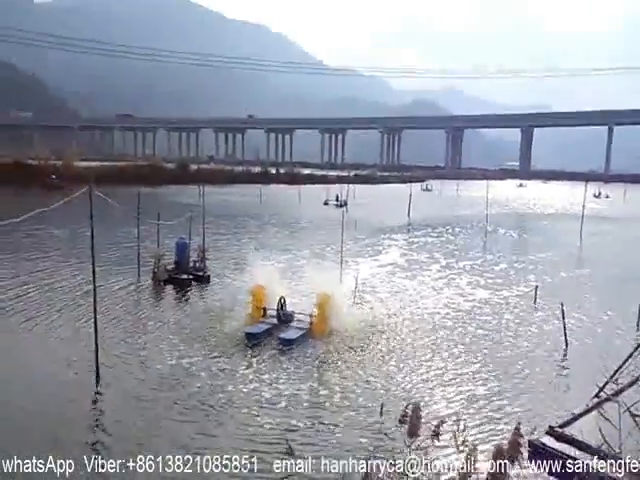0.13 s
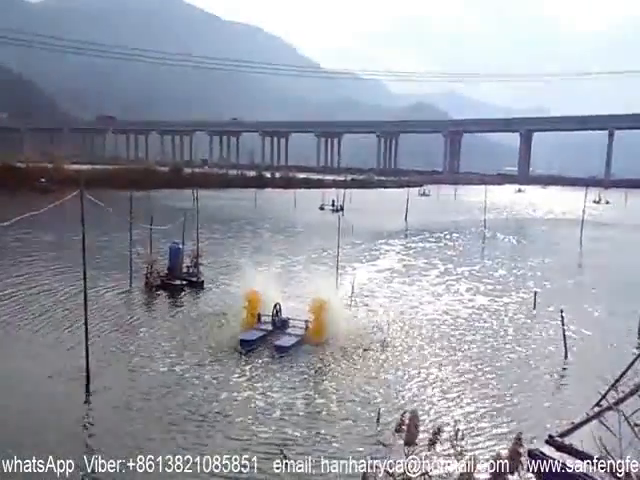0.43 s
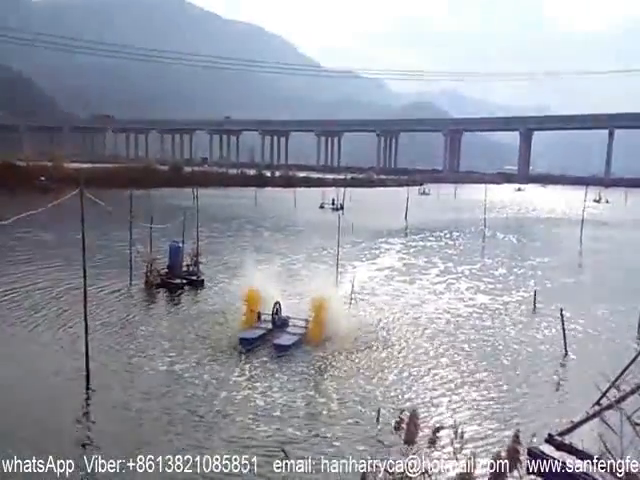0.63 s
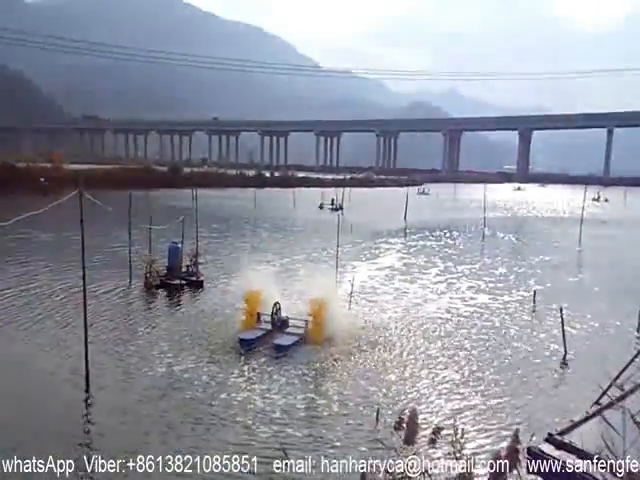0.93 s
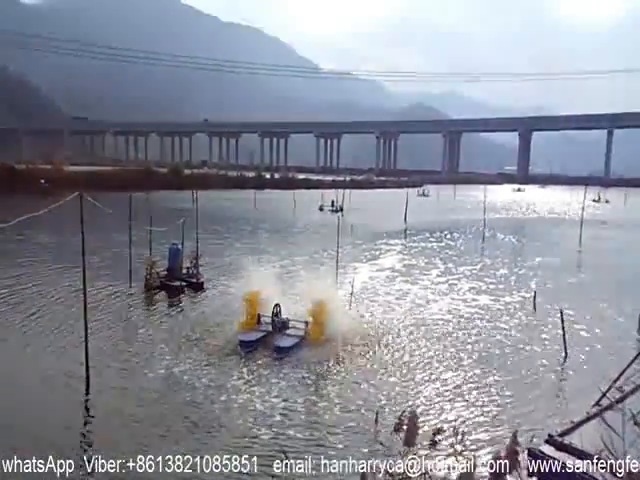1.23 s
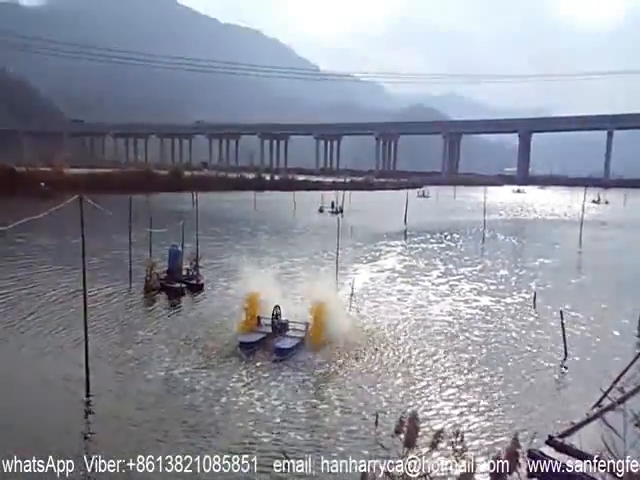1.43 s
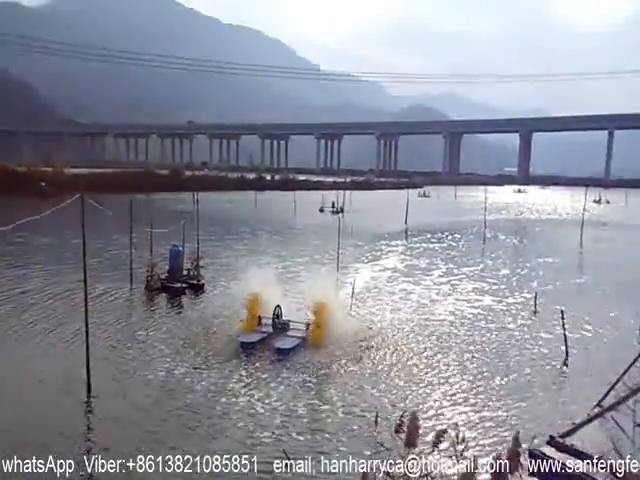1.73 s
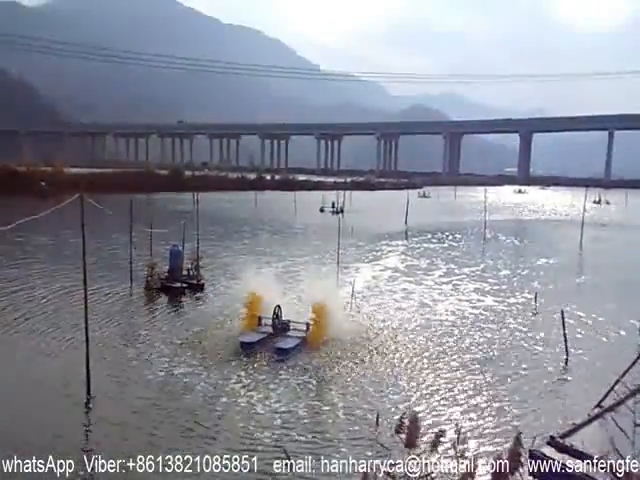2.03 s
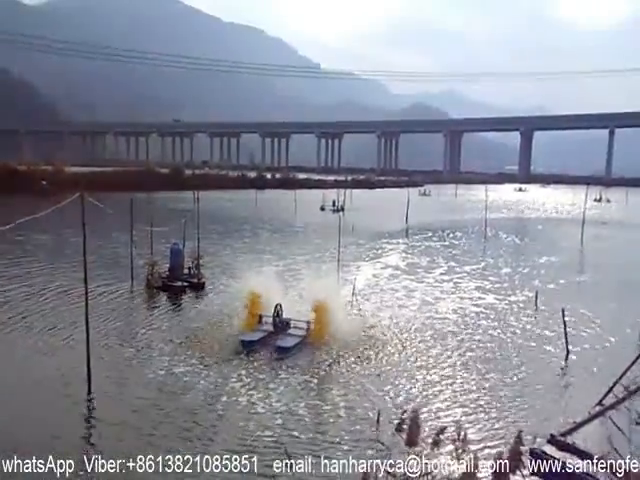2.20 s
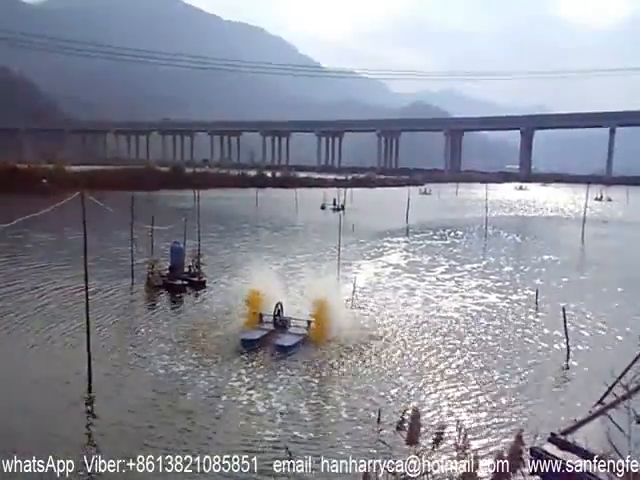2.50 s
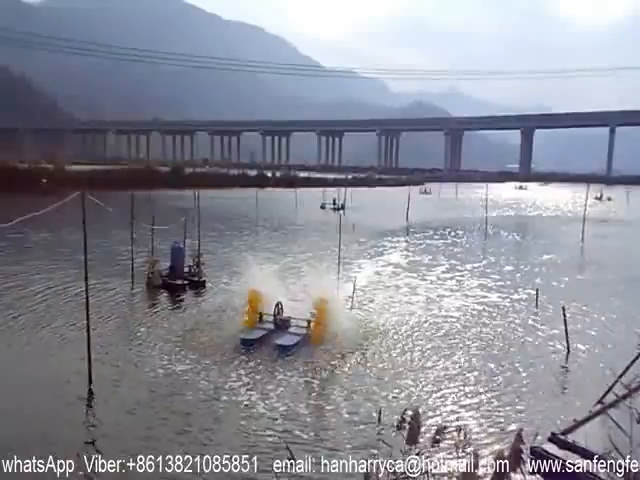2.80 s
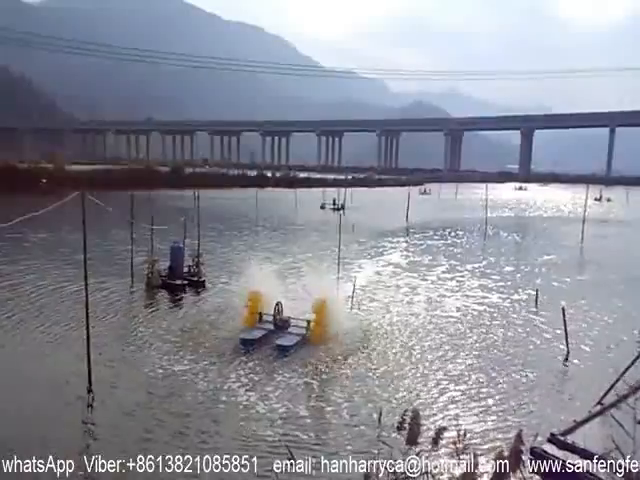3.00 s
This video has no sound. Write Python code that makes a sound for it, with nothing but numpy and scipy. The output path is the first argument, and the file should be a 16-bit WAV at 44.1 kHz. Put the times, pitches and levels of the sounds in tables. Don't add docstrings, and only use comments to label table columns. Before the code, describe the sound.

Steady low gear hum and churning water spray from a pond aerator, with rumbling wind buffets

```python
import sys
import numpy as np
from scipy import signal
from scipy.fft import rfft, irfft, next_fast_len
from scipy.io import wavfile

SR = 44100
rng = np.random.default_rng(int(sys.argv[2]) if len(sys.argv) > 2 else 0)


def voltage_ratio(level):
    return 10 ** (np.asarray(level, float) / 20)


def waveform_to_disk(signal):
    frames = np.transpose(np.atleast_2d(signal))
    scaled = np.clip(frames, -1, 1) * 32767
    samples = np.round(scaled).astype(np.int16)
    wavfile.write(sys.argv[1], SR, samples)


N = 138915

TURN_S, MESH_HZ = 0.6226, 128.5
# multiple of mesh rate, level/dB
GEAR_TONES = [(1, -24.5), (2, -27.5), (2.62, -37), (3, -35), (4, -42.5), (5, -40.5), (5.4, -55), (6, -34)]
# throbs/turn, depth/dB, first crest t/s
TONE_THROBS = [
    [(1, 1.2, 0.42), (4, 1, 0.13)],
    [(1, 2.6, .565), (3, 1.3, .17), (6, 3.6, .006), (7, 1.5, .031)],
    [(2, 3.5, 0.067), (4, 5, 0.0015), (7, 4.5, 0.058), (11, 4, 0.018)],
    [(1, 5.5, .05), (2, 1.8, .04), (4, 2.2, .151), (6, 2.6, .003)],
    [(1, 3, 0.62), (6, 5, 0.0011)],
    [(8, 4.5, .025), (11, 1.8, .037), (12, 1.8, .031)],
    [(1, 5.5, 0.72), (2, 8, 0.54), (3, -10, 0.31), (6, 16, 0.15)],
    [(1, 1.4, 0.17), (2, 1.6, 0.28), (6, 2.5, 0.08), (12, 1, 0.013)],
]
# sways/turn, depth/cycles, first crest t/s
TONE_SWAYS = [
    [(6, .04, .076)],
    [(6, .08, .066), (12, .04, .009)],
    [(6, .05, .07)],
    [(2, .06, .21), (6, .11, .08), (12, .05, .01)],
    [(2, .08, .289), (6, .08, .082)],
    [(1, .08, .272), (6, .17, .068), (8, .09, .006)],
    [(6, .1, .07)],
    [(2, .05, .269), (6, .13, .078)],
]
TONE_WOBBLE_HZ = [.2, .3, 4, .6, 1.5, 2, 8, .9]
# t/s, level/dB
FLOAT_RIDE = [(0, -5), (.55, .5), (1.3, 0), (1.9, 1.5), (2.45, 3), (3.15, 0)]
# t into turn/s, level/dB, length/s, ring f/Hz
ROUGH_TEETH = [
    (.04, -24, .011, 2030),
    (.146, -26, .006, 2000),
    (.238, -34, .008, 2000),
    (.352, -33, .007, 2000),
    (.47, -38, .01, 1950),
    (.56, -40, .012, 1950),
    (.177, -28, .014, 1150),
    (.28, -31, .012, 1150),
    (.582, -28, .01, 1150),
    (.33, -34, .015, 1150),
]
TURN_HARSHNESS_DB = [1, .5, 0, -4, -1, -1]
# f/Hz, density/dB
BODY_SPECTRUM = [(70, -2.5), (130, -22), (200, -11.5), (370, -12), (460, -20.5), (750, -14.5),
                 (1000, -33.5), (1500, -35)]
# f/Hz, density/dB
SPRAY_SPECTRUM = [(1000, 4.5), (1350, 1.5), (1620, -4.5), (1950, 1), (2400, -3.5), (4700, -6.5),
                  (5600, -11), (7000, -21)]
# f/Hz, density/dB
HISS_SPECTRUM = [(5000, -11), (6300, -1.5), (8500, -3), (10500, -1.5), (12800, 3), (14400, -2.5)]
# f/Hz, likeness/0-1
PORT_LIKENESS = [(100, 0.4), (300, 0.62), (1000, 0.93), (2300, 1), (6500, 1), (7800, 0.97), (10000, 0.84),
                 (14000, 0.8)]
# t/s, peak level/dB, f/Hz
LONE_DROPS = [
    (1.125, -25.5, 2520),
    (1.29, -39, 3050),
    (1.393, -33, 3400),
    (1.45, -27, 3170),
    (1.597, -23.5, 2480),
    (1.599, -27, 3630),
    (1.779, -28, 2480),
    (1.843, -27, 2050),
    (1.89, -24.5, 3400),
    (2.011, -31, 3330),
]
# t/s, level/dB
WIND_LEVEL = [(0.0, -15.5), (0.12, -10.5), (0.34, -15.5), (0.65, -19), (0.66, -15), (1.44, -20.5),
              (1.51, -14), (1.78, -17.5), (2.18, -19), (2.24, -14), (2.42, -14), (2.56, -1.5), (2.65, -14),
              (2.75, 2.5), (2.79, -11.5), (3.15, -13.5)]
# f/Hz, density/dB
WIND_SPECTRUM = [(9, 7), (30, 12), (60, 8), (110, 3.5), (200, -9), (400, -23.5)]
# t/s, right peak level/dB, length/s, f/Hz, left against right/dB
EDDY_STRIKES = [(0.126, -10, 0.012, 35, -2.5), (.195, -14.5, 0.03, 92, -6), (0.509, -12, 0.015, 53, 0.5),
                (0.589, -4.5, 0.0059, 134, -5), (0.629, -9, 0.016, 44, 4), (0.692, -6.5, 0.005, 113, -13),
                (0.763, -5, 0.004, 54, -5), (1.077, -11.5, 0.0055, 46, 5), (1.502, -11, 0.033, 56.5, -12),
                (1.534, -19, 0.0069, 29, 5), (1.643, -17.5, 0.038, 45, 3), (1.705, -11, 0.0078, 103, -5),
                (2.25, -3.5, 0.0073, 36.5, -1), (2.467, -4, 0.005, 148, -23), (2.506, -4, 0.0026, 164, -9),
                (2.548, -10, 0.005, 42, 1), (2.572, -2.5, 0.0035, 102, -17), (2.593, -3, 0.0058, 114, -3),
                (2.737, -1.5, 0.017, 69, -24), (2.757, -4.5, 0.02, 101, -12),
                (2.852, -8.5, 0.019, 53.6, -6), (3.14, -9.5, 0.01, 124, -7), (3.058, -7.5, 0.0087, 57, -7),
                (3.124, -6, 0.013, 86, -13), (.125, -8, 0.048, 11.4, -2), (0.239, -17, 0.023, 20, 6),
                (0.423, -19, 0.0069, 87, 2), (0.743, -12.5, 0.045, 9.4, 2), (1.173, -19.5, 0.089, 64, -1),
                (1.307, -16.5, 0.0083, 68, 3), (1.542, -8, 0.036, 27, 1), (1.63, -14, 0.036, 14, 6),
                (2.008, -19, 0.012, 56, -2), (2.255, -9, 0.021, 16, -1), (2.472, -16, 0.021, 16, -9),
                (2.694, -16, 0.012, 79, -12), (2.992, -16, 0.014, 40, -1), (3.085, -9.5, 0.022, 20, 1),
                (1.678, -17.5, 0.027, 79, -2), (2.533, -15, 0.018, 36, -5)]
# t/s, level/dB
RECORDER_GAIN = [(0.0, -43), (0.02, -45.5), (0.61, -43.5), (0.63, -44), (1.37, -42), (1.66, -43.5),
                 (2.0, -41.5), (2.45, -44.5), (2.7, -50.5), (2.96, -56.5), (3.15, -53)]


def in_time(rows):
    s, v = np.transpose(rows)
    return np.interp(np.arange(N) / SR, s, v)


def at_hz(points, hz):
    f, v = np.transpose(points)
    return np.interp(np.log(hz), np.log(f), v)


def rms_one(x):
    return x / np.sqrt(np.mean(x ** 2) + 1e-20)


def drift(rate_hz):
    hop, settle = 40, 2000
    r = np.exp(-2 * np.pi * rate_hz * hop / SR)
    noise = rng.standard_normal(N // hop + 2 + settle)
    slow = signal.lfilter([1], [1, -2 * r, r * r], noise)[settle:]
    return np.interp(np.arange(N) / hop, np.arange(len(slow)), rms_one(slow - slow.mean()))


def ring(clicks, hz, t60_s):
    r, w = voltage_ratio(-60 / (t60_s * SR)), 2 * np.pi * hz / SR
    return signal.lfilter([0, np.sin(w)], [1, -2 * r * np.cos(w), r * r], clicks + 1e-18)


def coloured(spectrum, likeness, shared_db, own_db, rate_hz):
    size = next_fast_len(N)
    f = np.maximum(np.arange(size // 2 + 1) * SR / size, 1)
    low, high = spectrum[0][0], spectrum[-1][0]
    alike = np.clip(at_hz(likeness, f), 0, 1)
    mid, side = rfft(rng.standard_normal((2, size))) * voltage_ratio(at_hz(spectrum, f))
    pair = np.sqrt(1 + alike) * mid + np.sqrt(1 - alike) * side * [[1], [-1]]
    place = 2 * np.log2(f / low)
    out, together = 0, drift(rate_hz)
    for k in range(int(2 * np.log2(high / low)) + 2):
        bell = np.cos(np.pi / 2 * np.clip(place - k, -1, 1)) ** 2
        flicker = voltage_ratio(shared_db * together + own_db * drift(rate_hz))
        out = out + flicker * irfft(pair * bell, size)[:, :N]
    return rms_one(out)


def gear_hum():
    tooth_skew_cycles, wander_db = 0.1501, 1.0
    t, out = np.arange(N) / SR, 0
    slip = np.cumsum(0.05 * drift(2.56)) / SR
    for (multiple, level_db), throbs, sways, wobble_hz in zip(GEAR_TONES, TONE_THROBS, TONE_SWAYS, TONE_WOBBLE_HZ):
        db = sum(d * np.cos(2 * np.pi * round(n) * (t - s) / TURN_S) for n, d, s in throbs)
        if multiple == 3:
            db = db + in_time(FLOAT_RIDE)
        db = level_db + db + wander_db * drift(8.2)
        cycles = round(multiple, 2) * (MESH_HZ * t + slip)
        cycles = cycles + np.cumsum(wobble_hz * drift(10.2)) / SR
        cycles = cycles + rng.random() + tooth_skew_cycles * multiple ** 2
        cycles = cycles + sum(d * np.cos(2 * np.pi * n * (t - s) / TURN_S) for n, d, s in sways)
        out = out + voltage_ratio(db) * np.sqrt(2) * np.sin(2 * np.pi * cycles)
    return out


def gear_chatter():
    jitter_s, spread_db, ring_t60_s = 0.0001, 1.1, 0.02
    teeth_s = np.arange(0, N / SR - 0.01, 1 / MESH_HZ)
    turn = (teeth_s // TURN_S).astype(int)
    out = 0
    for s, level_db, length_s, hz in ROUGH_TEETH:
        luck = rng.standard_normal((3, len(teeth_s)))
        swell = np.exp(-0.5 * ((teeth_s % TURN_S - s) / length_s) ** 2)
        db = level_db + np.take(TURN_HARSHNESS_DB, turn) + spread_db * luck[2]
        clicks = np.zeros(N)
        clicks[np.abs((teeth_s + jitter_s * luck[0]) * SR).astype(int)] = swell * voltage_ratio(db)
        out = out + ring(clicks, hz, ring_t60_s)
    return out


def wash():
    body = voltage_ratio(-26.5) * coloured(BODY_SPECTRUM, PORT_LIKENESS, 0.13, 1.0, 6)
    spray = voltage_ratio(-36.5) * coloured(SPRAY_SPECTRUM, PORT_LIKENESS, 0.43, 1.0, 33)
    hiss = voltage_ratio(-41) * coloured(HISS_SPECTRUM, PORT_LIKENESS, 0.93, 0.76, 54)
    return body + spray + hiss


def drops():
    drops_per_s, level_db, spread_db = 2000, -47.5, 2.8
    sizes = voltage_ratio(spread_db * np.minimum(rng.exponential(1, N), 4)) * rng.choice([-1, 1], N)
    born = rng.random(N) < drops_per_s * voltage_ratio(4 * drift(9)) / SR
    dealt = rng.integers(0, 14, N)
    out = 0
    for k, hz in enumerate(np.geomspace(1300, 9000, num=14)):
        out = out + ring(sizes * born * (dealt == k), hz, 7.4 / hz)
    return voltage_ratio(level_db) * rms_one(out)


def lone_drops():
    t60_s = 0.012
    return sum(ring(voltage_ratio(db) * (np.arange(N) == int(s * SR)), hz, t60_s) for s, db, hz in LONE_DROPS)


def wind_rumble():
    trim_db, alike, left_db = -5, 0.77, 2
    rumble = coloured(WIND_SPECTRUM, [(20, alike)], 0.94, 1.7, 3.3)
    return voltage_ratio(in_time(WIND_LEVEL) + trim_db) * rumble * voltage_ratio(np.array([[left_db], [0]]))


def wind_buffets():
    ragged_db, ragged_reach, left_own = -11.5, 2.65, 0.22
    t, out = np.arange(N) / SR, np.zeros((2, N))
    own, shared = rng.standard_normal((2, N))
    white = np.array([shared + left_own * own, shared])
    lucks = rng.standard_normal((len(EDDY_STRIKES), 3))
    for (s, db, length_s, hz, left_db), luck in zip(EDDY_STRIKES, lucks):
        near = slice(int((s - 3 * length_s) * SR), int((s + 3 * length_s) * SR))
        u = t[near] - s
        port_phase = np.array([[luck[2] / 4], [0]])
        swing = 2 * np.pi * hz * u + 0.94 * luck[0] * (hz * u) ** 2 + luck[1] + port_phase
        band = signal.butter(2, [hz, ragged_reach * hz], "band", fs=SR, output="sos")
        ragged = signal.sosfilt(band, white)[:, near]
        swell = voltage_ratio(db + np.array([[left_db], [0]])) * np.exp(-0.5 * (u / length_s) ** 2)
        out[:, near] += swell * (np.cos(swing) + voltage_ratio(ragged_db) * rms_one(ragged))
    return out


def scene():
    aerator = gear_hum() + gear_chatter() + wash() + drops() + lone_drops()
    return voltage_ratio(in_time(RECORDER_GAIN) + 43.0) * aerator + wind_rumble() + wind_buffets()


def roll_off(x):
    return signal.sosfilt(signal.butter(12, 14670, fs=SR, output="sos"), x)


def record(dry):
    left_trim_db, bass_share, clip_top = -0.7, 0.67, 0.95
    bass = dry[0]
    for cut_hz in (1600, 5900):
        bass = signal.lfilter(*signal.butter(1, cut_hz, fs=SR), bass)
    x = np.array([voltage_ratio(left_trim_db) * (dry[0] - bass_share * bass), dry[1]])
    x = signal.sosfilt(signal.butter(1, 9, "high", fs=SR, output="sos"), x)
    x = x / (1 + (x / clip_top) ** 8) ** (1 / 8)
    x = signal.sosfilt(signal.ellip(12, 0.5, 70, 14200, fs=SR, output="sos"), x)
    return roll_off(x)


dry = scene()
out = record(dry)
waveform_to_disk(out)
```